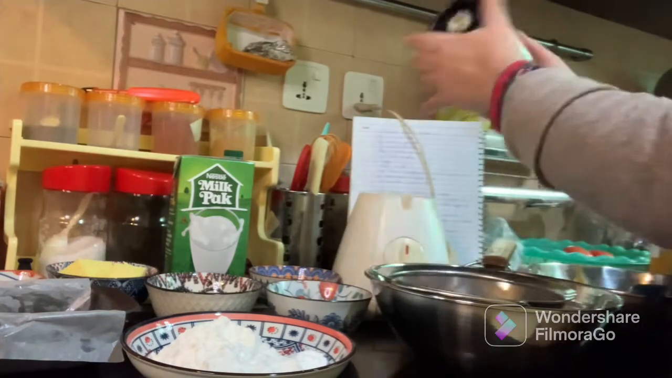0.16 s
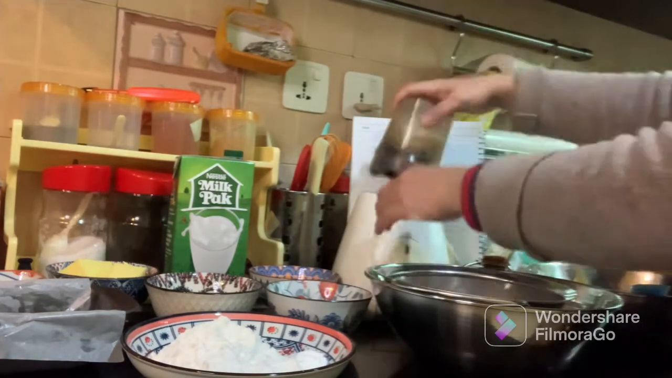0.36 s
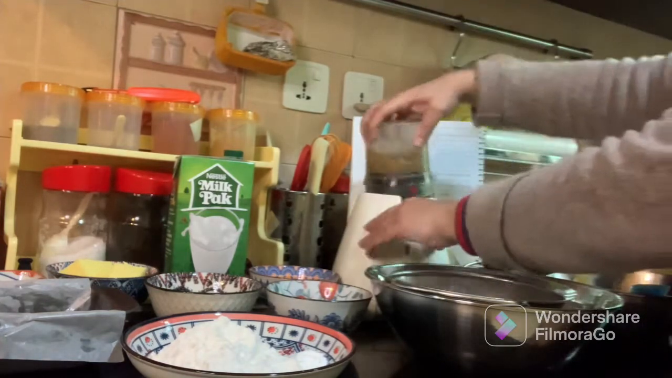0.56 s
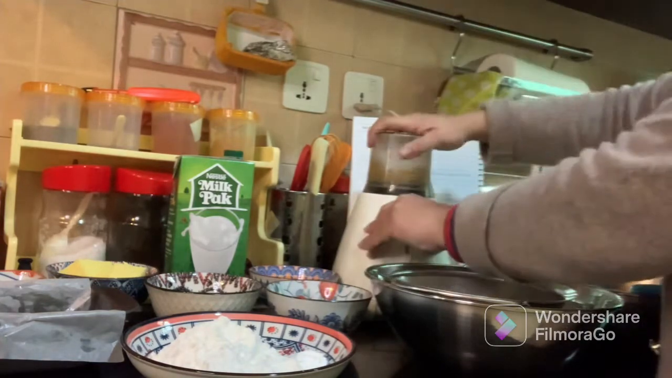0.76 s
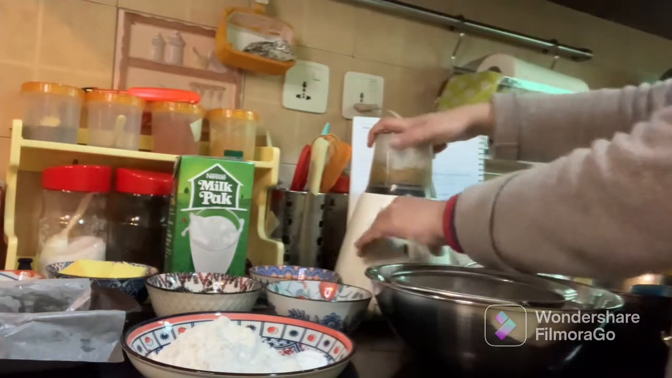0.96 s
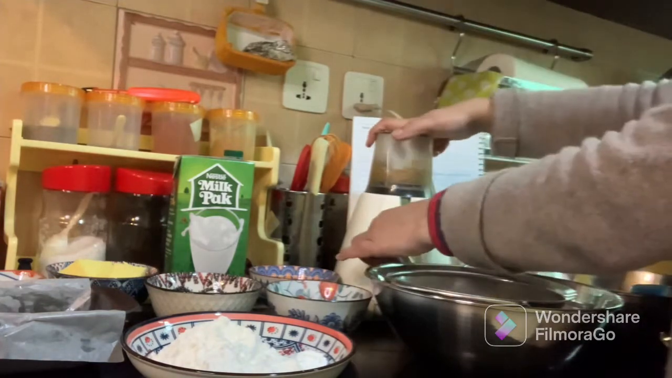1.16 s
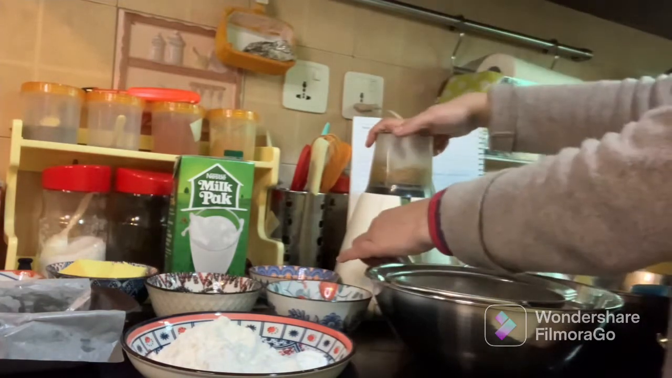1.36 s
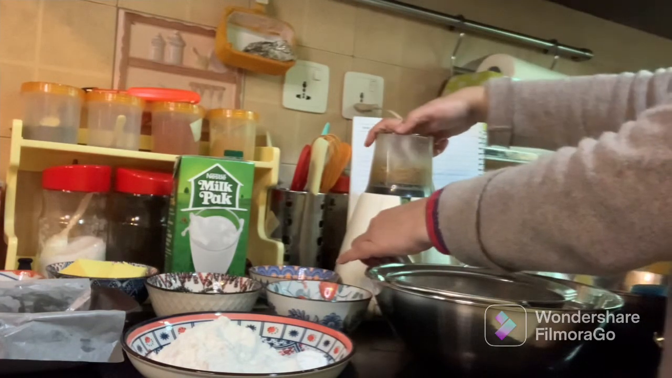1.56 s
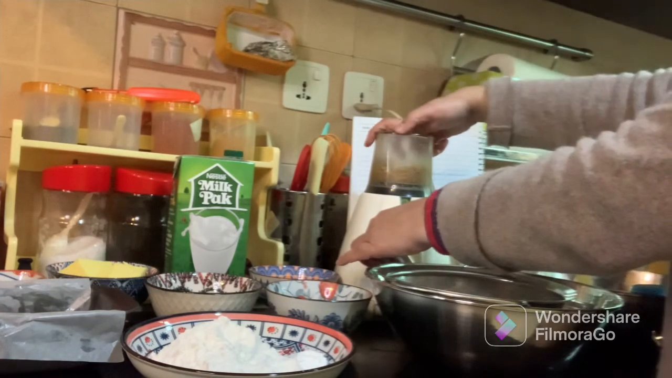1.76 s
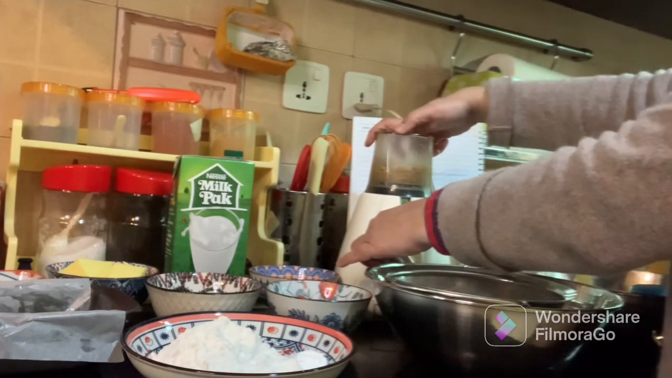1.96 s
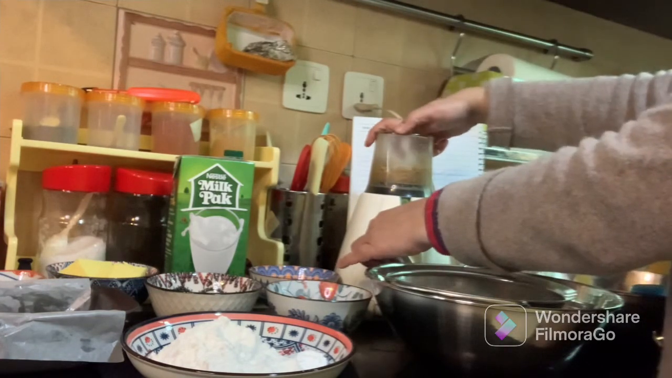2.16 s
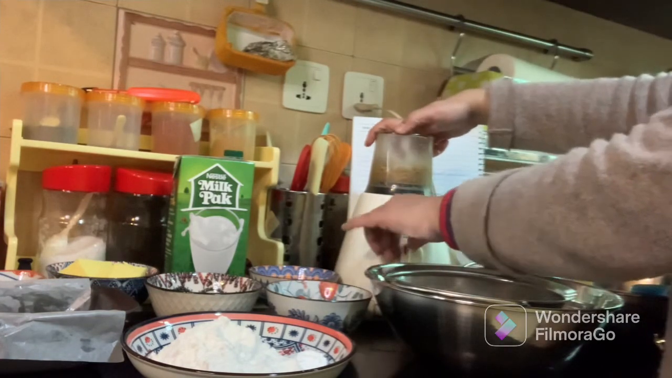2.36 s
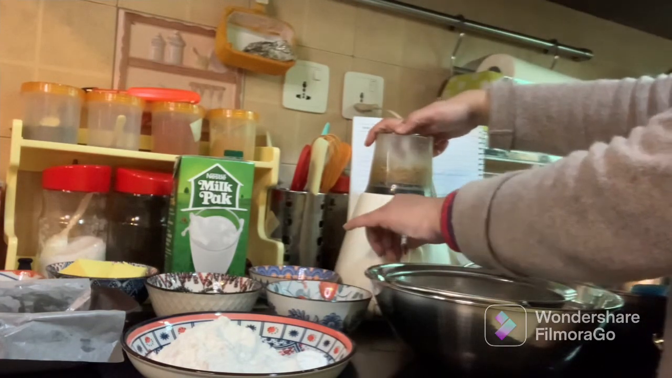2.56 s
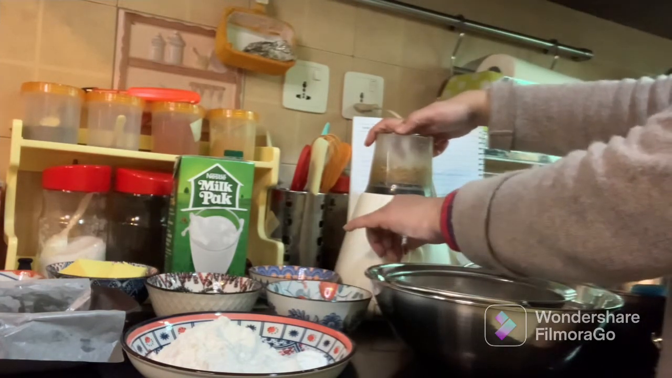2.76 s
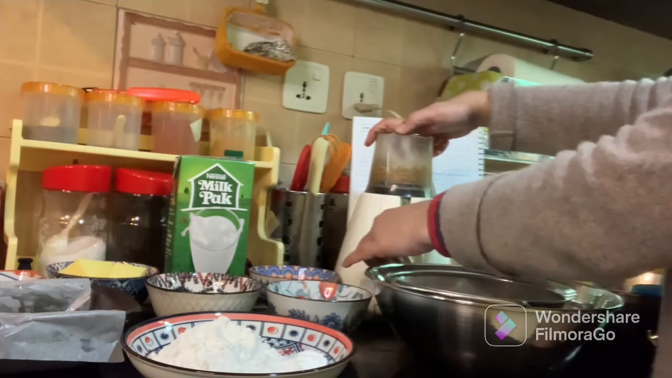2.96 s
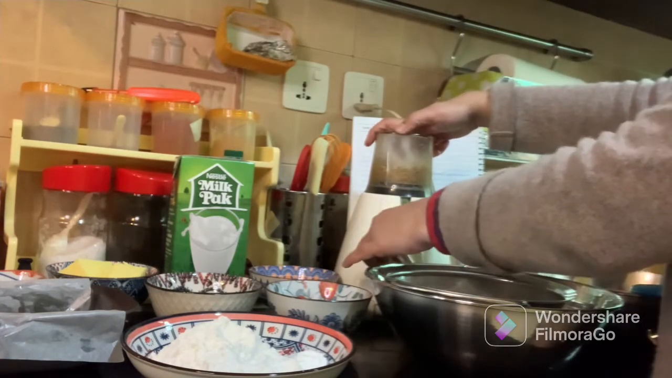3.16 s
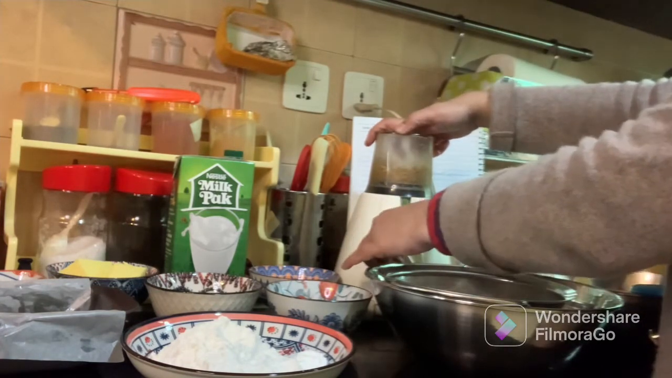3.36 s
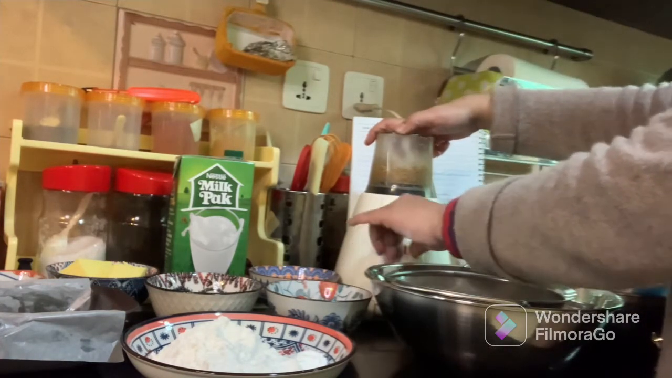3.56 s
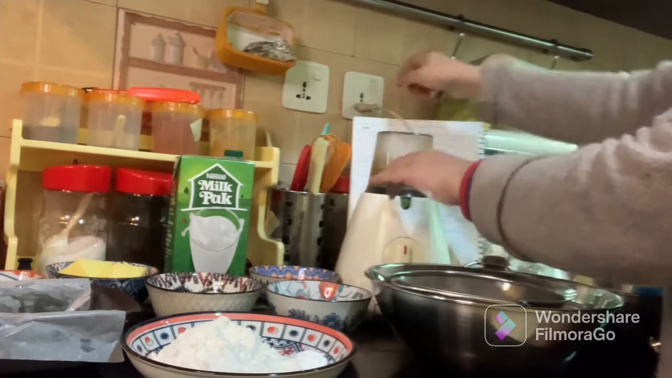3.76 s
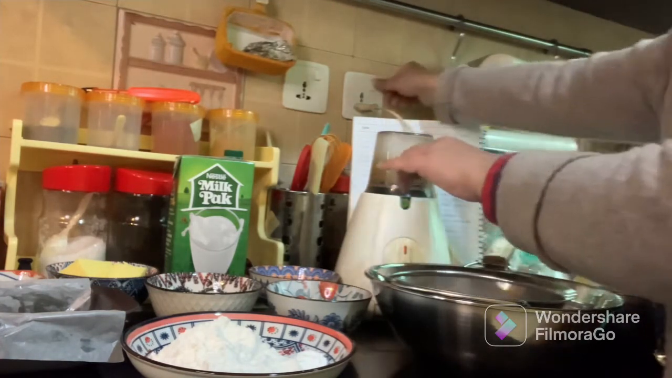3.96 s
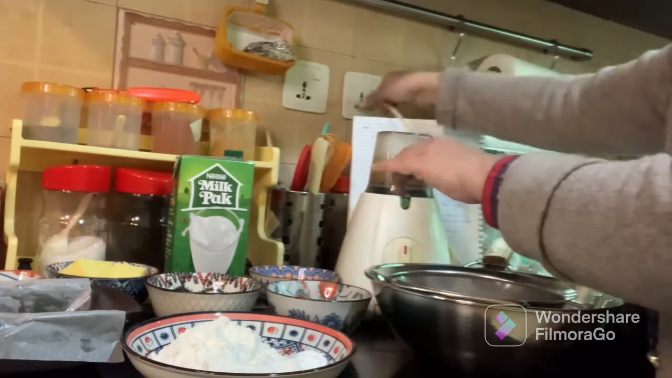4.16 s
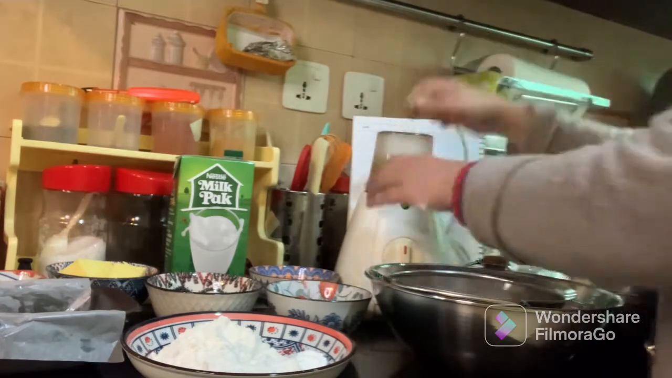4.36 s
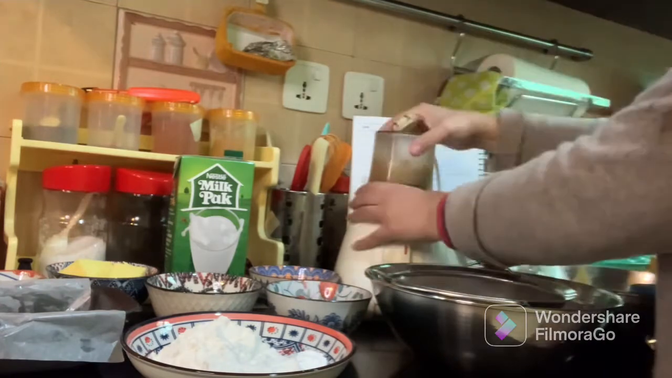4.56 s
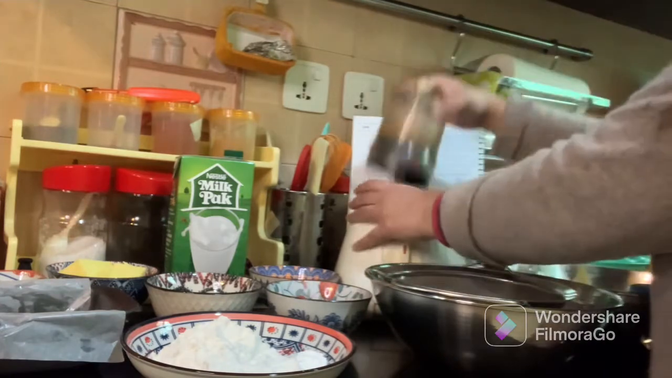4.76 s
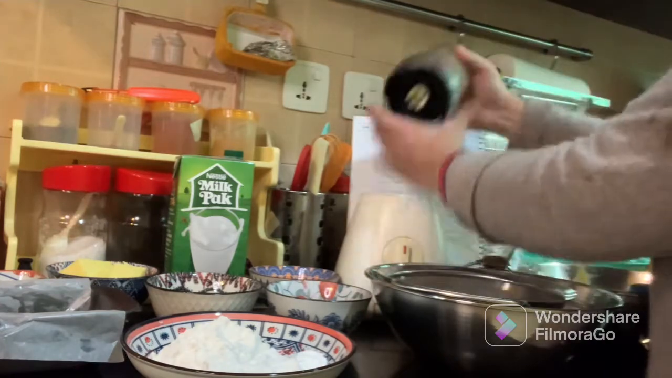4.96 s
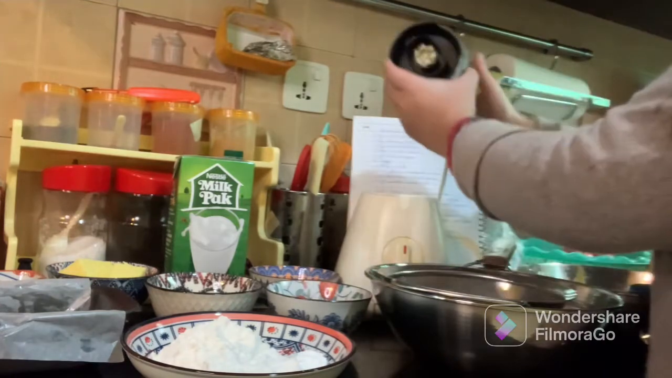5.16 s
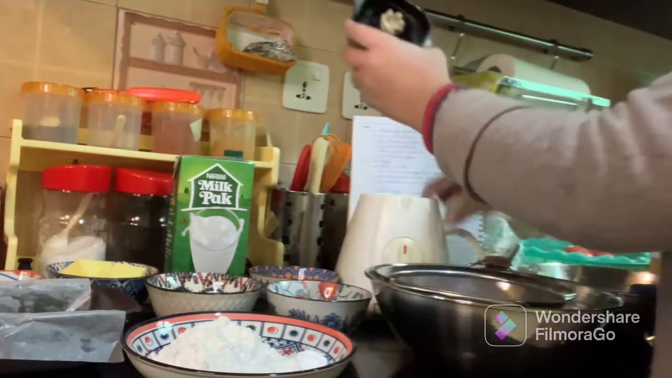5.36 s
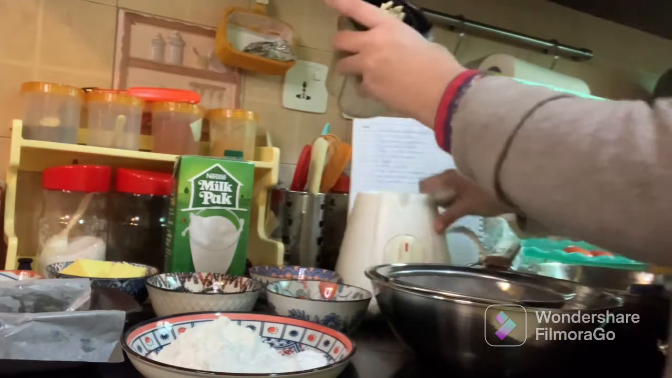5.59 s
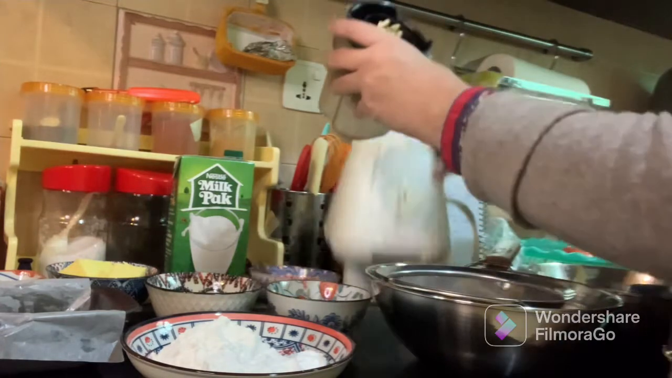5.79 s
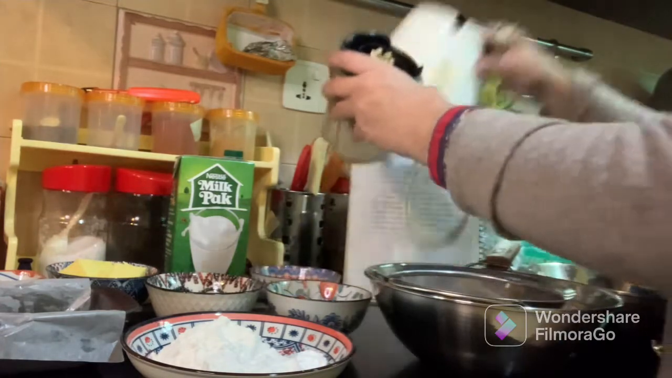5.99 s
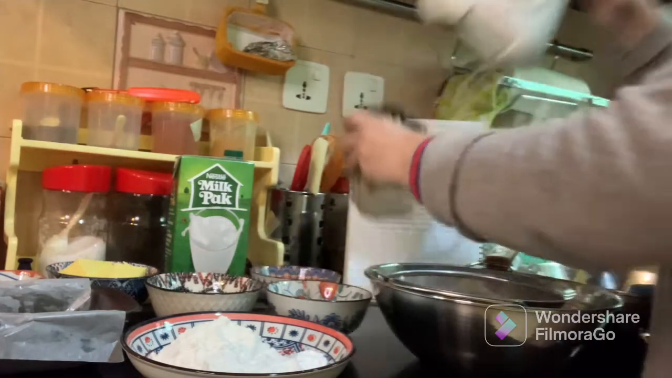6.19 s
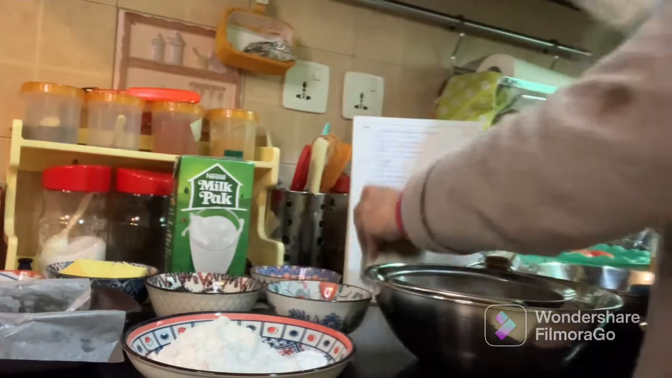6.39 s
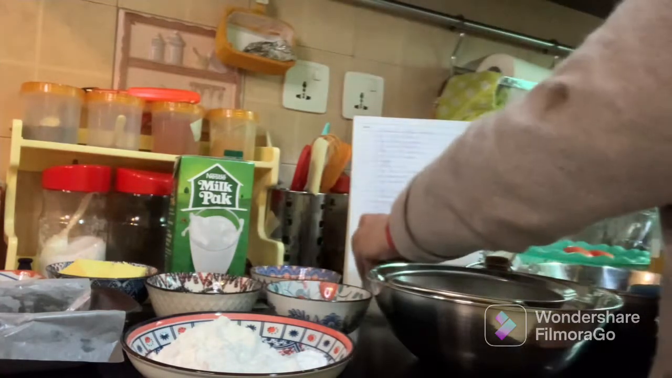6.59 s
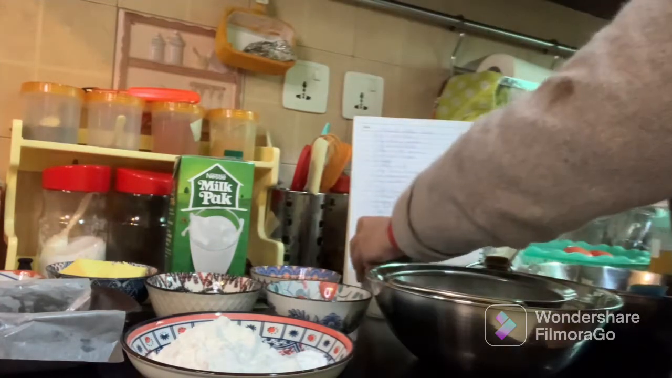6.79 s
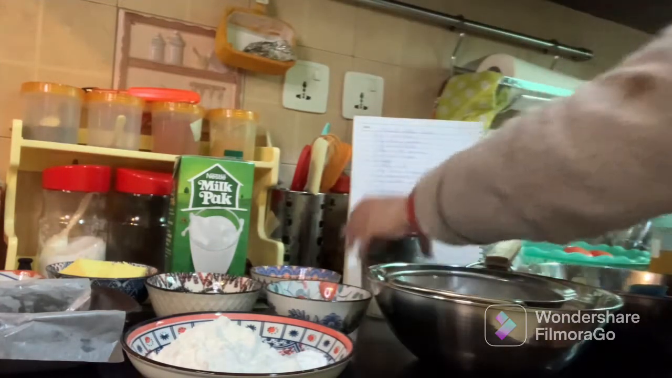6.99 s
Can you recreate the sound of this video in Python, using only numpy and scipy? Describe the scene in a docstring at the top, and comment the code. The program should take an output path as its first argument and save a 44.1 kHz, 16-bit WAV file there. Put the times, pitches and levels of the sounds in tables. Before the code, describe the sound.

Close handheld-style stereo pickup in a quiet tiled kitchen. A faint steel ring fades, hands thud and click a plastic jar onto a small chopper. The motor spins up, harshly grinding and rattling nuts for over a second, coasts down, then gives a shorter burst. Clicks unlock the jar, a utensil clinks, the base bumps down with its plug rattling, and a steel bowl clanks.

```python
"""A tiled kitchen, heard in stereo through a phone. A steel dish rings away faintly, then hands seat a plastic
jar on a small electric chopper. Twice the motor runs up and coasts down: tones follow the shaft, and random
impacts, swept by two blade wings, ring the jar as nuts are flung at its wall. The jar comes off, a utensil
clinks, the base bumps down with its plug rattling, a lid is tapped and a bowl clanks. Blows are short noise
bursts that excite decaying modes; shaped noise gives the quiet room and a low rumble that grows after 4.4 s."""
import sys
import numpy as np
from scipy import signal
from scipy.fft import rfft, irfft
from scipy.io import wavfile
from scipy.ndimage import uniform_filter1d, map_coordinates

SR = 44100
rng = np.random.default_rng(int(sys.argv[2]) if len(sys.argv) > 2 else 0)


def file_out(sig):
    """Save sig as 16-bit WAV at sys.argv[1]."""
    # one column per channel
    cols = np.atleast_2d(sig).T
    # limit, then scale
    lim = np.clip(cols, -1, 1)
    pcm = np.round(lim * 32767).astype(np.int16)
    wavfile.write(sys.argv[1], SR, pcm)


N = 310002
TIME = np.arange(N) / SR


def undb(db):
    """Turn decibels into an amplitude factor."""
    return 10 ** (np.asarray(db) / 20)


def unit(x):
    """Scale to rms 1."""
    return x / np.sqrt(np.mean(x ** 2))


def unit_energy(x):
    """Scale to a sum of squares of 1."""
    return x / np.sqrt(np.sum(x ** 2))


def over_time(points):
    """Read (seconds, value) points sample by sample."""
    return np.interp(TIME, *np.transpose(points))


def along(points, hz):
    """Read (Hz, value) points on a log-frequency axis."""
    f, value = np.transpose(points)
    return np.interp(np.log(np.maximum(hz, 1)), np.log(f), value)


def convolve(x, response):
    """Filter and keep the length."""
    return signal.fftconvolve(x, response)[:len(x)]


def butter(x, hz, kind):
    """Second-order Butterworth filter."""
    return signal.sosfilt(signal.butter(2, hz, kind, fs=SR, output="sos"), x)


def colour(points, tilt_db=0, size=4096):
    """Minimum-phase response of a spectrum, tilted by dB per octave above 200 Hz."""
    hz = np.maximum(np.arange(size // 2 + 1) * SR / size, 1)
    db = along(points, hz) + tilt_db * np.log2(np.maximum(hz, 200))
    # folding the cepstrum forward in time makes the response causal
    cepstrum = irfft(np.log(undb(db)))
    cepstrum[1:size // 2] *= 2
    cepstrum[size // 2 + 1:] = 0
    return unit_energy(irfft(np.exp(rfft(cepstrum))))


def resonate(x, peaks):
    """Parallel resonances (Hz, width in Hz, dB)."""
    out = 0
    for hz, width, db in peaks:
        b, a = signal.iirpeak(hz, hz / width, fs=SR)
        out = out + undb(db) * signal.lfilter(b, a, x)
    return out


def ring(modes):
    """One second of decaying modes; each has a weaker twin close by and beats with it."""
    t = TIME[:SR]
    out = 0
    for hz, db, t60 in modes:
        twin_hz = hz * (1 + 0.012 * rng.standard_normal())
        pair = np.sin(2 * np.pi * hz * t) + .5 * np.sin(2 * np.pi * twin_hz * t)
        decay = np.exp(-np.log(1000) * t / t60)
        out = out + undb(db) * unit_energy(pair * decay)
    return out


def walk(rate):
    """Smooth random drift, rms 1, with about rate new values a second."""
    k = int(SR / rate)
    held = rng.standard_normal(N)[np.arange(N) // k]
    return unit(uniform_filter1d(uniform_filter1d(held, k), k))


def grains(rate, spread_db):
    """Tiny impacts of either sign, rate a second, a few far larger than the rest."""
    size = undb(spread_db * np.minimum(rng.exponential(size=N), 5))
    struck = rng.random(N) < rate / SR
    return unit(struck * size * rng.choice([-1, 1], N))


def swell(s, half_s):
    """A smooth rise and fall about a moment, 1 at the top."""
    return np.exp(-((TIME - s) / half_s) ** 2)


def add(track, s, sound):
    """Lay a sound into a track."""
    start = int(s * SR)
    track[start:start + len(sound)] += sound[:N - start]


# Reverberation of the tiled room. Each row: frequency in Hz, 60 dB decay time in seconds.
ROOM_DECAY = [(150, 0.69), (500, 0.58), (1400, 0.53), (4000, 0.46), (8000, 0.44), (15000, 0.33)]
PORT_LAG = 5  # samples by which the direct sound is late at the left microphone port


def room(x, direct_db, wet_db, pan_db, early_db, early_s=0.0083):
    """Direct sound, right port first, then quick reflections off counter and jars, then the tiled room."""
    t = TIME[:SR]
    hz = np.arange(SR // 2 + 1)
    centres = np.geomspace(125, 16000, 8)
    out = []
    # a negative pan makes the left port the weaker one
    for lag, side_db in ((PORT_LAG, pan_db / 2), (0, -pan_db / 2)):
        noise = rfft(rng.standard_normal(SR))
        tail = 0
        for centre, share in zip(centres, np.eye(len(centres))):
            band = irfft(noise * along(np.c_[centres, share], hz), SR)
            tail = tail + band * np.exp(-np.log(1000) * t / along(ROOM_DECAY, centre))
        early = rng.standard_normal(SR) * np.exp(-t / early_s) * (t > .001)
        response = undb(wet_db) * unit_energy(tail * (t > .005)) + undb(early_db) * unit_energy(early)
        response[lag] += undb(direct_db)
        out.append(undb(side_db) * convolve(x, response))
    return np.array(out)


def stereo_noise(spectrum, side_db):
    """Steady coloured noise, partly alike at both ports."""
    mid, side = (convolve(rng.standard_normal(N), colour(spectrum)) for _ in range(2))
    return mid + undb(side_db) * side * np.array([[1], [-1]])


# Spectrum of the quiet kitchen. Each row: frequency in Hz, relative dB per Hz.
KITCHEN_SPECTRUM = [(15, -22), (25, -18.5), (64, 2), (165, -43), (211, 5), (276, -30), (361, -16.5),
                    (4690, -51), (6850, -38), (9720, -64.5), (15800, -39)]
# Spectrum of the low rumble. Each row: frequency in Hz, relative dB per Hz.
RUMBLE_SPECTRUM = [(15, -46), (25, -16.5), (75, 12.5), (188, 7.5), (236, -28), (249, -56), (300, -16),
                   (390, -46), (660, -120)]
# The rumble, growing in the second half. Each row: time in seconds, level in dB.
RUMBLE_DB = [(0, -69), (.5, -69.5), (4.4, -70), (4.8, -56), (6, -56.5), (7, -59)]


def background():
    """Quiet kitchen noise, broad between the ports, and a nearly central low rumble that grows."""
    kitchen = undb(-68) * stereo_noise(KITCHEN_SPECTRUM, side_db=2.0)
    return kitchen + undb(over_time(RUMBLE_DB)) * stereo_noise(RUMBLE_SPECTRUM, side_db=-13.0)


# Modes of a steel dish. Each row: frequency in Hz, relative energy in dB, 60 dB decay time in seconds.
STEEL_DISH = [(1940, 0, 0.2), (3628, -5, 0.28), (4500, -9, .34), (5530, -21, .45), (6578, -21, 0.29)]


def fading_steel():
    """A steel dish rings away faintly at the start, as a sum of decaying modes."""
    track = np.zeros(N)
    add(track, 0, undb(-35) * ring(STEEL_DISH))
    return track


# Spectrum of hands on plastic. Each row: frequency in Hz, relative dB per Hz.
HAND_SPECTRUM = [(100, -15), (300, 9.5), (500, 1), (1000, -2), (2500, -15), (5500, -24.5), (8000, -44.5),
                 (15800, -46.5)]
# Hands sliding on plastic. Each row: middle in seconds, half length in seconds, level in dB before the room,
# brightness in dB per octave.
HAND_RUBS = [(0, 0.072, -69, 7.5), (0.727, 0.073, -75.5, 9.5), (3.12, 0.073, -64, 7.5),
             (4.398, 0.016, -81, 4.5), (4.75, 0.35, -61, 4.5), (5.092, 0.028, -65, 13),
             (5.488, 0.15, -61, 4.5), (5.767, 0.091, -68, 4.5), (6.164, 0.24, -65.5, 4),
             (6.3, 0.032, -83.5, 6), (6.81, 0.18, -58.5, 2.5)]


def hands():
    """Fingers and sleeves rub in small catches; a faint sleeve rustle runs on between the rubs."""
    catches = undb(2 * walk(25.23)) * grains(2500, spread_db=2.0)
    track = undb(-79.5) * convolve(catches, colour(HAND_SPECTRUM))
    for s, half_s, db, tilt_db in HAND_RUBS:
        track += undb(db) * swell(s, half_s) * convolve(catches, colour(HAND_SPECTRUM, tilt_db))
    return track


def blows(rows, spectrum, modes, spot_db=7, spot_width=.5):
    """A blow is a tick inside a short scrape; it sets off a dull crack and the modes of the thing struck."""
    track, lead = np.zeros(N), .05  # seconds left for the scrape to rise
    t = TIME[:SR] - lead
    for s, db, length, tilt_db, spot_hz, ring_db in rows:
        # the scrape rises a little faster than it falls
        envelope = np.exp(-np.maximum(t, -t / .7) / length)
        force = unit_energy(rng.standard_normal(SR) * envelope)
        # the shorter the scrape, the stronger its tick
        force[int(lead * SR)] += 2 * np.exp(-length / 0.00073)
        force = unit_energy(force)
        # the spot that is struck answers with one broad resonance
        crack = convolve(force, colour(spectrum, tilt_db))
        crack = unit_energy(crack + resonate(crack, [(spot_hz, spot_width * spot_hz, spot_db)]))
        # the modes take the blow as one push
        push = np.cumsum(force ** 2)
        ringing = push * np.roll(unit_energy(ring(modes)), int(lead * SR)) * (t >= 0)
        add(track, s - lead, undb(db) * (crack + undb(ring_db) * ringing))
    return track


# Columns of every table of blows below: time in seconds, energy of the crack in dB before the room,
# scrape length in seconds, brightness in dB per octave, pitch of the spot struck in Hz, ring in dB re crack.
# Columns of every table of modes: frequency in Hz, relative energy in dB, 60 dB decay time in seconds.
# Columns of every table of a spectrum: frequency in Hz, relative dB per Hz.

# Blows: lid taps, columns as above.
TAPS_ON_LID = [(6.485, -12.5, 0.0016, 0.0083, 1900, 1)]
# Spectrum of the lid, columns as above.
LID_SPECTRUM = [(300, -17), (1200, -25), (1750, -2), (1970, 9), (2200, -14), (2800, -36.5), (3900, -6),
                (6000, -40), (15800, -77)]
# Modes of the lid, columns as above.
LID_RING = [(1942, 10, 0.13), (1820, -2, 0.19), (3890, -24, 0.053)]


def lid_taps():
    """A tap whose crack and strongest modes crowd near 1.9 kHz."""
    return blows(TAPS_ON_LID, LID_SPECTRUM, LID_RING, spot_db=13)


# Spectrum of struck steel, columns as above.
STEEL_SPECTRUM = [(40, -37), (140, -13), (260, -8), (400, -5), (620, -2.5), (820, -5), (1000, -6.5),
                  (1500, -13.5), (3000, -9), (4500, -9.5), (6300, -11.5), (8500, -34), (12000, -24.5),
                  (15800, -37)]
# Blows on a steel bowl, columns as above.
CLANKS_ON_BOWL = [(6.6558, -5, 0.0014, 5, 2000, -14), (6.6572, 2, 0.0017, -1, 660, 0.5),
                  (6.662, -6, 0.0037, -1, 447, 2.5)]
# Modes of the bowl, columns as above.
BOWL_RING = [(150, -2.5, 0.6), (320, -12, 0.24), (373, -3, 0.29), (451, 0, 0.16), (481, -2, 0.48),
             (550, 6.5, 0.37), (627, 4.5, 0.22), (650, 0, 0.3), (800, -0.5, 0.14), (1168, -4, 0.51),
             (1805, 3, 0.13), (1883, -1, 0.14), (1960, 3.5, 0.17), (3881, -9, 0.34), (5650, -10, 0.27),
             (5710, -3.5, 0.26), (6150, -17, 0.33), (7068, -16, 0.23)]
# Blows on a utensil, columns as above.
CLINKS_OF_UTENSIL = [(5.2348, -13, 0.0016, 3.5, 5150, -9)]
# Modes of the utensil, columns as above.
UTENSIL_RING = [(1920, 4, 0.2), (2966, -19, 0.31), (2280, -5, 0.22), (3540, 3, 0.27), (3935, 1, 0.28),
                (4900, -3, 0.25), (4370, 0, 0.26), (5470, -16, .15), (6100, -12, 0.3), (6600, 0, 0.3),
                (12310, -14, 0.23)]


def steel():
    """A utensil clinks with high modes, and a bowl clanks with many low and high ones."""
    bowl = blows(CLANKS_ON_BOWL, STEEL_SPECTRUM, BOWL_RING, spot_db=2)
    return bowl + blows(CLINKS_OF_UTENSIL, STEEL_SPECTRUM, UTENSIL_RING, spot_db=6)


# Spectrum of the plug's knocks, columns as above.
PLUG_SPECTRUM = [(40, -37.5), (150, -11), (500, -1), (1000, 1), (2300, 3), (3500, -4), (6000, -20.5),
                 (8000, -53), (15800, -17.5)]
# Modes of the plastic shell, columns as above.
SHELL_RING = [(1262, -20, .4), (1487, -12, .14), (1697, -21, .22), (2100, -18, .08), (3451, -26, .7)]
# The plug bouncing on the base. Each row: time in seconds, energy in dB before the room, shell pitch in Hz.
PLUG_BOUNCES = [(5.8718, -2, 1410), (5.8743, 13, 1386), (5.88, 7, 1420), (5.884, 0, 1410),
                (5.8901, 3, 1460), (5.9219, 8.5, 1350), (5.926, 7.5, 1420), (5.9315, -2, 1300),
                (5.959, 0.5, 1320), (5.962, 2, 1260), (5.9672, 1.5, 1390), (5.985, 5, 1260),
                (5.9898, 1, 1450), (5.995, 2.5, 1226)]
CHATTER_S, CHATTER_DB = .03, -13  # decay and level of the small bounces after each knock


def plug():
    """Hard, short knocks into one broad resonance of the shell; the cord chatters and the shell rings on."""
    knocks, bodies, tick = np.zeros(N), np.zeros(N), colour(PLUG_SPECTRUM)
    for s, db, hz in PLUG_BOUNCES:
        shell = butter(tick, hz * np.exp([-.13, .13]), "band")
        add(bodies, s, undb(db) * unit_energy(shell))
        add(knocks, s, undb([db]))
    # energy left in the cord after each knock
    energy = np.abs(convolve(knocks ** 2, np.exp(-TIME[:SR] / CHATTER_S)))
    shaken = np.sqrt(energy / (CHATTER_S * SR))
    ticks = undb(-10) * knocks + undb(CHATTER_DB) * shaken * grains(900, spread_db=0)
    return bodies + convolve(ticks, tick) + convolve(knocks, ring(SHELL_RING))


# Blows as the base is put away, columns as above.
BUMPS_OF_BASE = [(5.8078, 3, 0.0011, 1.5, 990, -3.5), (5.8125, 0.5, 0.0054, -0.5, 436, 8.5),
                 (5.84, 1.3, 0.0016, -6, 1380, -20)]
# Spectrum of the bumps, columns as above.
BUMP_SPECTRUM = [(100, -32), (390, -16), (850, -4), (1300, -15.5), (2200, -14), (4000, -20.5),
                 (6000, -23.5), (8000, -62), (15800, -32)]
# Modes of the base, columns as above.
BASE_RING = [(395, -0.5, 0.12), (830, -19, 0.036), (1504, 5, 0.32), (3490, -9.5, 0.52), (3770, -10, 0.086),
             (5970, -19, 0.25), (6060, -17.5, .2), (11960, -16.5, 0.2)]


def base_bumps():
    """The base is put away in close bumps, each a crack with the base's modes."""
    return blows(BUMPS_OF_BASE, BUMP_SPECTRUM, BASE_RING)


# Sharp plastic clicks: the switch and the jar's catch, columns as above.
PLASTIC_CLICKS = [(.925, -9, 0.0042, 3.2, 1380, -31), (1.182, -35, 0.0085, 3.4, 7550, -29),
                  (4.089, -10.5, 0.0058, 3.5, 5500, -25), (4.32, -40, 0.018, 5.2, 2800, -24),
                  (4.475, -12.5, 0.0054, 4, 2060, -15.5), (4.487, -16.5, 0.0035, 3.8, 1930, 5),
                  (4.508, -21, .014, 3, 2300, -13), (4.564, -15, 0.015, 5.8, 805, -16),
                  (4.7945, -21, 0.0006, 8, 4400, -10), (5.159, -33, 0.0017, 0.8, 2750, -18),
                  (5.195, -43, 0.0032, 1, 2720, -11)]
# Spectrum of the clicks, columns as above.
CLICK_SPECTRUM = [(100, -9), (300, 11), (750, -11.5), (1400, -15), (2300, -13.5), (4000, -18),
                  (6300, -24.5), (10000, -31.5), (15800, -36.5)]
# Modes of the clicking plastic, columns as above.
CLICK_RING = [(1910, -9, 0.32), (2004, 6, 0.092), (2620, -23, 0.15), (3600, -5, 0.029)]


def plastic_clicks():
    """Switch and catch click and snap, with a strong resonance at the spot struck."""
    return blows(PLASTIC_CLICKS, CLICK_SPECTRUM, CLICK_RING, spot_db=13, spot_width=0.54)


# Blows on the jar: handling thuds, and one lump striking inside at 1.572 s, columns as above.
KNOCKS_ON_JAR = [(.452, -28, 0.01, 8.5, 750, 3), (.495, -24, 0.036, 3.5, 364, -1.5),
                 (.59, -41.5, 0.026, 7.5, 680, 16), (.635, -28.5, 0.094, 2.5, 605, 6.5),
                 (.768, -2.5, 0.0084, 4.5, 282, -3.5), (.808, -12.5, 0.0069, 4, 294, 4),
                 (.932, -10.5, 0.016, 8.5, 1180, -16), (.965, -17, 0.022, 3.5, 1130, -17),
                 (1.572, -4, 0.063, 7, 626, -18), (4.624, -17, 0.015, 5.5, 1310, -9),
                 (4.657, -24, 0.0052, 1, 400, -11), (4.761, -26, 0.001, 9.5, 1000, -7),
                 (4.768, -12.5, 0.0042, -1.5, 640, -6), (4.774, -16, 0.011, 4, 2300, -13),
                 (4.808, -31.5, 0.011, 10, 310, 23), (4.8435, -23, 0.03, 6.5, 320, 14.5),
                 (5.317, -26, 0.007, 4.5, 1170, -17.5), (5.495, -15.5, 0.0015, 4.5, 1130, 0.5)]
# Spectrum of the thuds, columns as above.
THUD_SPECTRUM = [(50, -87.5), (100, -6.5), (170, 9), (310, -1), (450, -2), (900, -5.5), (1800, -18),
                 (4000, -29), (10000, -50.5), (15800, -61.5)]
# Modes of the jar, columns as above.
JAR_RING = [(256, 8, 0.11), (277.5, 12.5, 0.19), (319, 15.5, 0.28), (681, 5, 0.099), (1145, -5.5, 0.23),
            (1450, -28, 0.2)]


def jar_knocks():
    """Handling thuds and one lump set off the jar's low modes."""
    return blows(KNOCKS_ON_JAR, THUD_SPECTRUM, JAR_RING)


def knocks_in_room():
    """Each kind of knock, click and rub is placed in the room with its own direct sound and reflections."""
    jar = room(jar_knocks() + hands(), direct_db=2.5, wet_db=-5, pan_db=-0.5, early_db=9.0, early_s=0.013)
    clicks = room(plastic_clicks(), direct_db=3, wet_db=0, pan_db=-.5, early_db=7, early_s=.008)
    base = room(base_bumps() + plug(), direct_db=-.5, wet_db=-10.3, pan_db=-2, early_db=-11, early_s=.012)
    taps = room(lid_taps() + fading_steel(), direct_db=4, wet_db=-3, pan_db=-1, early_db=-3)
    clanks = room(steel(), direct_db=4, wet_db=1, pan_db=0.0, early_db=-5)
    return jar + clicks + base + taps + clanks


# Presses of the button. Each row: on in seconds, off in seconds, nuts settle in seconds, spin-up time constant
# in seconds, grinding in dB at the press, fall as the nuts get finer in dB per second.
BUTTON_RUNS = [(1.17, 2.37, 3.01, .195, -30, 5), (3.135, 3.489, 4.15, 0.12, -30, 12)]
# Lumps caught by the blade. Each row: time in seconds, half length in seconds, grinding rise in dB,
# blade tone rise in dB, shaft slowed by Hz (negative is a slight gain).
CAUGHT_LUMPS = [(1.346, 0.04, 5, 18, 0.5), (1.53, 0.046, 6, 3, -0.5), (1.807, 0.07, 9, 15, 22),
                (1.905, 0.045, 6, 15, 20), (2.182, 0.076, 4.5, 1, 4), (2.598, 0.0051, 5, -23, 0),
                (2.758, 0.051, 8.5, 8.5, 0), (2.96, 0.024, 4.5, 15, -0.5), (3.257, 0.024, 5.5, 15, 0),
                (3.442, 0.056, 3, -8, 0), (3.856, 0.021, 11, 0, -1.5), (3.985, 0.12, 5, 12.5, -0.5),
                (4.111, 0.058, 13.5, 10, 0.5)]
TOP_SPEED_HZ, COAST_HZ_PER_S = 297, 330  # speed the driven shaft tends to; friction slows it evenly
SAG_LAG_S, SAG_HALF_S = .055, .07  # the shaft gives way late and slowly


def shaft_speed():
    """The shaft runs up while the button is held, sags after lumps and coasts down; in Hz, at least 1."""
    hz = np.zeros(N)
    for on, off, _, spin_up_s, *_ in BUTTON_RUNS:
        held_s = np.clip(TIME, on, off) - on
        driven = TOP_SPEED_HZ * (1 - np.exp(-held_s / spin_up_s))
        hz = np.maximum(hz, driven - COAST_HZ_PER_S * np.maximum(TIME - off, 0))
    sag = sum(sag_hz * swell(s + SAG_LAG_S, SAG_HALF_S) for s, _, _, _, sag_hz in CAUGHT_LUMPS)
    return np.maximum(hz - sag, 1)


def run_levels():
    """Strength of the grinding and seconds since the button went down."""
    load, run_s = np.zeros(N), np.zeros(N)
    for on, _, settle, _, db, fall_db in BUTTON_RUNS:
        started = TIME >= on
        run_s = np.where(started, TIME - on, run_s)
        settling = np.exp(-np.maximum(TIME - settle, 0) / 0.05)
        load += started * undb(db - fall_db * run_s) * settling
    return load, run_s


def shaft_tone(turns, count, lead=0):
    """A tone at a multiple of the shaft speed, wavering in phase and level."""
    phase = 2 * np.pi * count * turns + lead + .25 * walk(70)
    return np.sqrt(2) * np.sin(phase) * undb(2 * walk(28) - .5)


# Blade overtones. Each row: multiple of the shaft speed, relative level in dB.
BLADE_OVERTONES = [(2, -5), (3, -2.5), (4, -3.5), (5, -9), (7, -11), (8, -20)]
# Resonances of the air in the jar. Each row: frequency in Hz, width in Hz, level in dB.
JAR_AIR = [(520, 45, -3), (620, 30, 0), (800, 60, 0), (1080, 100, 0), (1450, 80, -2), (2100, 350, -4)]


def motor(turns, hum_db, blade_db):
    """Unbalance hums once a turn; blade overtones flare as they glide through the jar's cavity."""
    out = []
    for lead in (0, np.pi / 2):  # the ports are out of step
        blade = sum(undb(db) * shaft_tone(turns, k, lead) for k, db in BLADE_OVERTONES)
        hum = undb(hum_db) * shaft_tone(turns, 1, lead)
        out.append(hum + resonate(undb(blade_db) * blade, JAR_AIR))
    return np.array(out)


# Wander of the jar's resonances: share of pitch, rate a second, level in dB rms.
JAR_DRIFT, JAR_DRIFT_PER_S, JAR_SWAY_DB = .008, 12, 2.5


def shifting(x, peaks, count=3):
    """Groups of resonances drift in pitch and strength as the heap moves about the jar."""
    out = 0
    for k in range(count):
        warped = TIME + JAR_DRIFT / JAR_DRIFT_PER_S * walk(JAR_DRIFT_PER_S)
        drifting = map_coordinates(resonate(x, peaks[k::count]), [warped * SR], order=1)
        out = out + drifting * undb(JAR_SWAY_DB * walk(JAR_DRIFT_PER_S))
    return out


# Spectrum of nut pieces on the wall. Each row: frequency in Hz, relative dB per Hz.
NUT_SPECTRUM = [(88, -33), (150, -14.5), (259, -7), (390, -7), (801, -5.5), (901, -7), (1120, -0.5),
                (1250, -4), (1680, -8.5), (2040, -1), (2530, -6.5), (4720, -13.5), (6200, -19),
                (14600, -28.5), (15800, -40)]
# Resonances of the running jar. Each row: frequency in Hz, width in Hz, level in dB.
RUNNING_JAR = [(275, 10.3, -2), (367, 134, -2.5), (665, 20.6, 8), (816, 63, -2), (984, 17, 7.5),
               (1125, 39, 2), (1201, 27, -5.5), (1464.5, 17.6, 9), (1996, 15, 1), (2277, 59, -4),
               (2680, 35, -16), (3150, 41, 0), (3490, 69, 1), (3990, 55, 6), (4280, 11, 4.5), (4510, 25, 7),
               (4760, 22, 9), (4810, 15, -2)]
RIDE_SHARE = .28  # share of the impact that rides the blade and strikes again one turn later


def nuts(turns, speed_hz, tumble, treble_db, body_db):
    """Each of two blade wings flings pieces at the wall; the heap tumbles unevenly and the jar rings."""
    sweep = 1 + .15 * np.cos(2 * np.pi * turns) + .15 * np.cos(4 * np.pi * turns)
    impacts = grains(4000 + 30 * speed_hz, spread_db=1.5) * sweep * tumble
    impacts = impacts + sum(RIDE_SHARE ** k * np.interp(turns - k, turns, impacts) for k in (1, 2))
    wall = convolve(impacts, colour(NUT_SPECTRUM))
    wall = unit(undb(-1.5) * wall + shifting(wall, RUNNING_JAR))
    # treble and body are weighted apart; a lump favours the middle band
    treble = signal.sosfiltfilt(signal.butter(2, 3300, "high", fs=SR, output="sos"), wall)
    body = signal.sosfiltfilt(signal.butter(2, 900, fs=SR, output="sos"), wall)
    return wall - treble - body + treble * undb(treble_db) + body * undb(body_db)


def chops(turns, rows):
    """A caught piece is struck once a turn, unevenly, until it is worn away; it knocks at its own pitch."""
    track, t = np.zeros(N), TIME[:SR // 6]
    for s, length_s, db, hz in rows:
        shaft = turns[int(s * SR):][:len(t)] + rng.random()
        uneven = undb(3 * rng.standard_normal(len(t)))
        strikes = np.gradient(np.floor(shaft)) * np.exp(-t / length_s) * uneven
        knock = np.sin(2 * np.pi * hz * t) * np.exp(-t * hz / 1.96)  # dies within a few cycles
        knock = unit_energy(knock[:SR // 50])
        add(track, s, undb(db) * convolve(strikes, knock))
    return butter(track, 240, "high")  # keep the knocks above 240 Hz


PIECE_S, PIECE_SPREAD_DB = .022, 19  # time constant of wear, range of sizes
PIECE_LOW_HZ, PIECE_HIGH_HZ = 668, 4310


def small_pieces(count=240):
    """Pieces caught at random from first press to last settling: (s, length s, relative dB, pitch Hz)."""
    when, size, pitch = rng.random((count, 3)).T
    first, last = BUTTON_RUNS[0][0], BUTTON_RUNS[-1][2]
    s = first + (last - first) * (np.arange(count) + when) / count
    hz = PIECE_LOW_HZ * (PIECE_HIGH_HZ / PIECE_LOW_HZ) ** pitch
    return np.c_[s, np.full(count, PIECE_S), PIECE_SPREAD_DB * size, hz]


# Big pieces that hammer on the wall. Each row: start in seconds, time constant of wear in seconds,
# dB per strike before the room, pitch in Hz.
HAMMERING_PIECES = [(1.351, .015, -5, 1130), (1.797, 0.048, -0.5, 1120), (2.587, 0.014, -22, 770),
                    (2.776, 0.04, -11.5, 284), (3.26, 0.012, -8, 970), (3.87, 0.13, -9.5, 694)]
# Unbalance hum, coming and going through both runs. Each row: time in seconds, level in dB before the mix.
HUM_DB = [(1.25, -51.5), (1.36, -42), (1.45, -35), (1.54, -31.5), (1.59, -38), (1.65, -38), (1.74, -49),
          (1.83, -26.5), (1.93, -25), (2.01, -51), (2.12, -38.5), (2.23, -30), (2.28, -52), (2.38, -29),
          (2.47, -49), (2.55, -35), (2.7, -49), (2.85, -64), (3.18, -56), (3.27, -36), (3.33, -46),
          (3.4, -36), (3.48, -47.5), (3.58, -55), (3.69, -30.5), (3.78, -43), (3.9, -58)]
# Resonances of the motor housing. Each row: frequency in Hz, width in Hz, level in dB.
MOTOR_HOUSING = [(2250, 160, -2), (3160, 650, -17)]
FLING_START_HZ, FLING_FULL_HZ = 45.7, 123.4  # shaft speeds at which the nuts begin to fly and all fly
TREBLE_DB, BODY_DB = 3, -0.5  # shares of the grinding above 3300 Hz and below 900 Hz, before a lump
TREBLE_PER_LUMP_DB, BODY_PER_LUMP_DB, BODY_GAIN_DB_PER_S = -0.17, -.5, 2  # per dB of lump; through a run
BLADE_DB, BLADE_DB_PER_OCTAVE = -43.5, 1  # tone at top speed before the mix, and its fall at lower speeds


def chopper():
    """Motor and nuts share one shaft; grinding fades as the nuts get finer and surges at each lump."""
    speed_hz = shaft_speed()
    load, run_s = run_levels()
    turns = np.cumsum(speed_hz * (1 + 0.00484 * walk(60))) / SR
    lump_db = sum(db * swell(s, half_s) for s, half_s, db, _, _ in CAUGHT_LUMPS)
    strain_db = sum(db * swell(s, half_s) for s, half_s, _, db, _ in CAUGHT_LUMPS)
    flung = np.clip((speed_hz - FLING_START_HZ) / (FLING_FULL_HZ - FLING_START_HZ), 0, 1)
    strength = flung * load * undb(lump_db)
    treble_db = TREBLE_DB + TREBLE_PER_LUMP_DB * lump_db
    body_db = BODY_DB + BODY_PER_LUMP_DB * lump_db + BODY_GAIN_DB_PER_S * run_s
    # the hum wavers slightly at random; the blade tone changes under strain
    hum_db = over_time(HUM_DB) + 1.5 * walk(60)
    blade_db = BLADE_DB + BLADE_DB_PER_OCTAVE * np.log2(speed_hz / TOP_SPEED_HZ) + strain_db
    # twelve armature slots whine through the housing, most under current while the shaft gains speed
    gain_hz_per_s = uniform_filter1d(np.gradient(speed_hz) * SR, size=2048)
    current = np.clip(gain_hz_per_s / 500, .25, 1)
    slots = shaft_tone(turns, count=12) + shaft_tone(turns, count=13)
    whine = current * resonate(slots, MOTOR_HOUSING)
    # each port catches other pieces of the same tumbling heap
    tumble = undb(1.4 * walk(40))
    pieces = np.array([nuts(turns, speed_hz, tumble, treble_db, body_db) for _ in range(2)])
    grinding = strength * (pieces + undb(-3) * whine)
    echo = room(grinding[0], direct_db=-30, wet_db=-7, pan_db=-1.4, early_db=-13)
    # caught pieces give the coarse grain and short gliding overtones
    small = strength * undb(-6) * unit(chops(turns, small_pieces()))
    chopping = small + chops(turns, HAMMERING_PIECES)
    chopping = room(chopping, direct_db=-5, wet_db=-8, pan_db=-1.4, early_db=-2.5)
    # the gliding tones beat with their own reflections
    tones = flung * motor(turns, hum_db, blade_db)
    beating = room(tones[0], direct_db=-40, wet_db=-11, pan_db=0, early_db=-11)
    # the right port hears the direct grinding a little louder
    return undb([[-.2], [1.2]]) * grinding + echo + chopping + undb(-6.5) * tones + beating


def scene():
    """The quiet kitchen, the knocks of jar, base and steel, and the chopper."""
    return background() + knocks_in_room() + chopper()


TOP_HZ = 15900


def record(dry):
    """The phone cuts the top with a steep low-pass."""
    return signal.sosfilt(signal.ellip(10, .2, 70, TOP_HZ, fs=SR, output="sos"), dry)


dry = scene()
out = record(dry)
file_out(out)
```